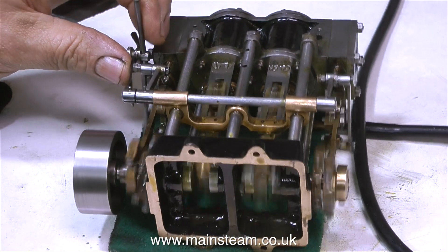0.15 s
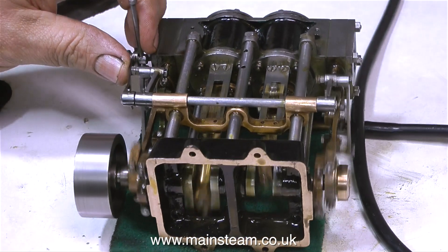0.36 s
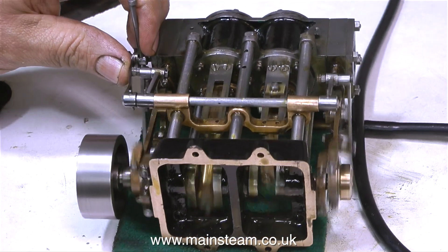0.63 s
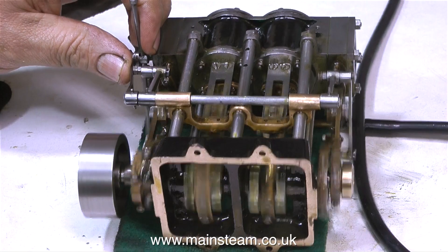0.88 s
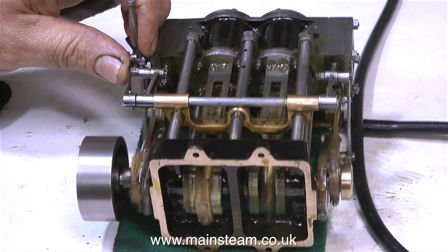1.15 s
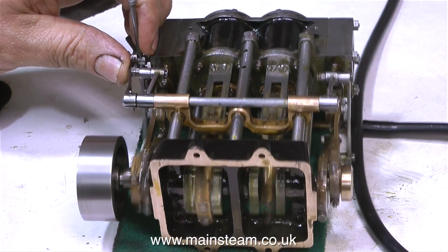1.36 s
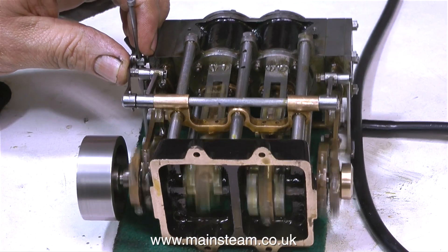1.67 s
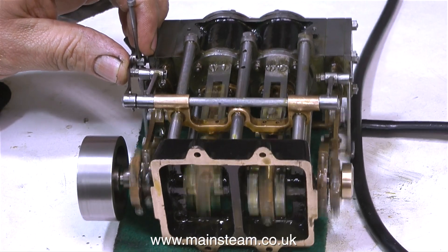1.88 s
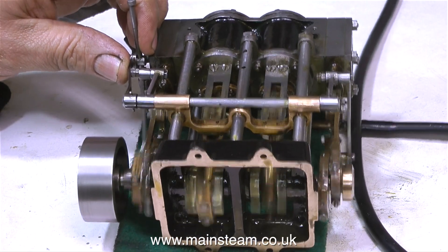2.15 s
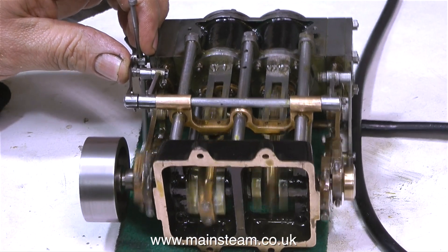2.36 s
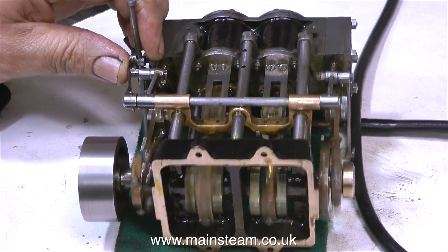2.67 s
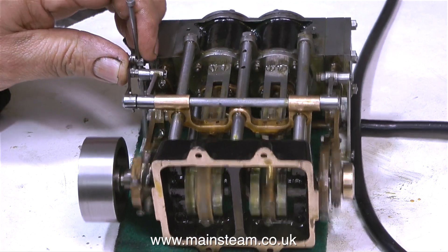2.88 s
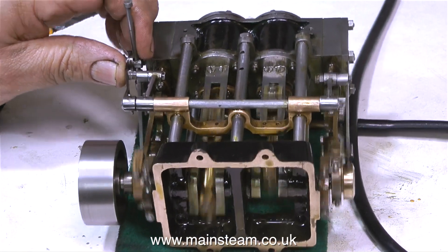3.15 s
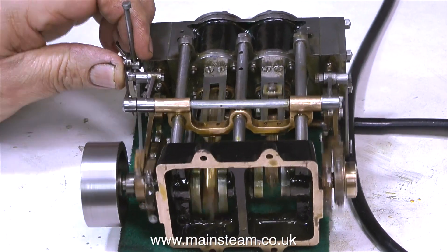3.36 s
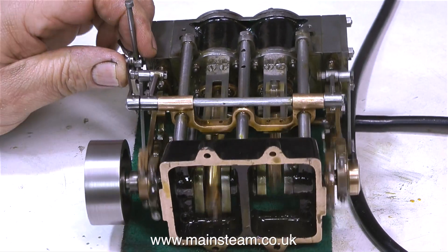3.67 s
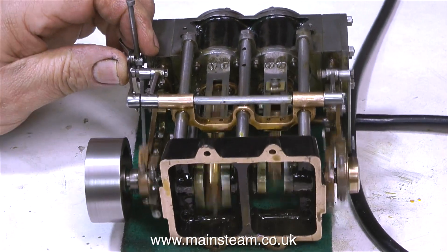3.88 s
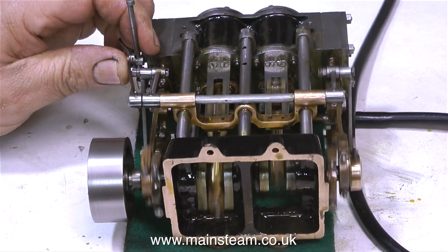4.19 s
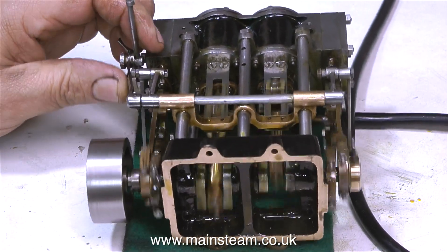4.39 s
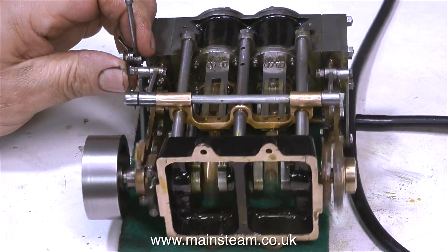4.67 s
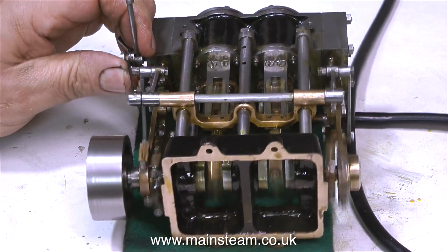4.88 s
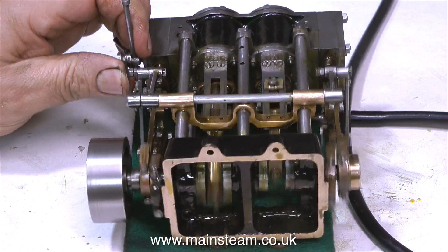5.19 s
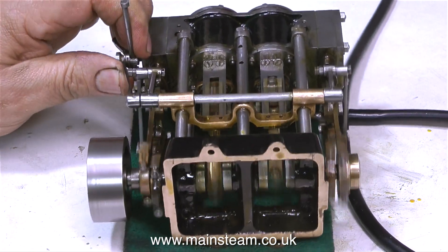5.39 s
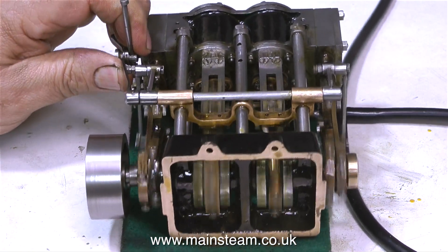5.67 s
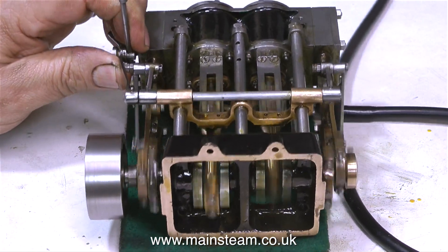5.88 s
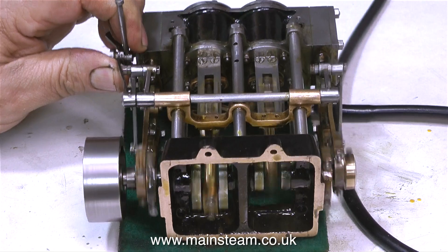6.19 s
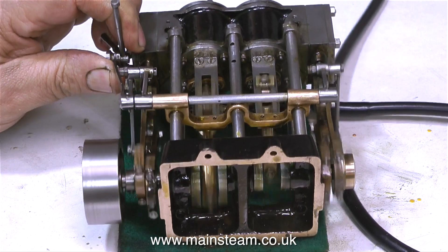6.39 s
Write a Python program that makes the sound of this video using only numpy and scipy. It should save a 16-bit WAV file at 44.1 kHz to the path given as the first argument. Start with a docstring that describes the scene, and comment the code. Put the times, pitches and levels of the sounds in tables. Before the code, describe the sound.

A small steam engine runs fast on compressed air, its rapid hissing exhaust beats joined by light knocks and metallic chatter.

```python
"""A twin-cylinder model steam engine runs on compressed air on a bench, at 13 rising to 16 turns a second.
From the start four exhaust beats a turn hiss through the ports, spitting oil,
and the connecting rod knocks. From 0.6 s slack links chatter in spells and the valve gear clinks.
From 1.2 s a link thuds against the reversing lever once a turn, in spells; from 2.3 s it groans too.
The knock softens at 3.7 s; after 5.4 s the motion settles and the exhaust beats on."""
import sys
import numpy as np
from scipy import signal
from scipy.fft import rfft, irfft
from scipy.io import wavfile

SR = 44100
rng = np.random.default_rng(int(sys.argv[2]) if len(sys.argv) > 2 else 0)


def wav_out(sig):
    """Save sig, one row per channel (or a flat mono array), as 16-bit PCM at SR to the path in sys.argv[1]."""
    wavfile.write(sys.argv[1], SR, np.round(np.clip(np.atleast_2d(sig).T, -1, 1) * 32767).astype(np.int16))


N = 288414

# Crankshaft speed. Each row: time in seconds, turns per second.
CRANK_SPEED = [(0.0, 13.163), (0.23, 13.467), (0.75, 14.753), (0.85, 14.671), (1.72, 14.955),
               (2.08, 15.213), (2.74, 15.004), (3.19, 15.529), (4.12, 15.314), (4.42, 15.124),
               (5.17, 15.104), (5.53, 15.701), (5.8, 15.936), (6.54, 15.884)]
# Valve gear modes. Each row: frequency in Hz, width in Hz, gain in dB.
GEAR_MODES = [(3570, 75, -10), (3697, 40, -1)]
# Crankcase and bed modes. Each row: frequency in Hz, width in Hz, gain in dB.
CASE_MODES = [(257, 56, -20), (286, 23, -1.5), (362.5, 15, 6.5), (386, 31, 6.5), (462, 84, -3),
              (533, 74, 1.5), (582, 23, -15), (710, 96, -20)]


def from_db(db):
    """Decibels to gain."""
    return 10 ** (np.asarray(db) / 20)


def unit_rms(x):
    """Scale to unit power."""
    return x / np.sqrt(np.mean(x ** 2) + 1e-20)


def curves(rows):
    """Interpolate rows of (seconds, values..) to every sample, one curve per value."""
    times_s, *columns = np.transpose(rows)
    return [np.interp(np.arange(N) / SR, times_s, column) for column in columns]


def drift(corner_hz):
    """Low-passed noise, unit RMS."""
    hz = np.arange(N // 2 + 1) * SR / N
    return unit_rms(irfft(rfft(rng.standard_normal(N)) / (1 + (hz / corner_hz) ** 2), N))


def noise(spectrum):
    """Unit-RMS noise shaped by rows of (Hz, dB)."""
    hz, db = np.transpose(spectrum)
    bin_hz = np.arange(N // 2 + 1) * SR / N
    gain = from_db(np.interp(np.log(bin_hz + 1), np.log(hz), db))
    return unit_rms(irfft(rfft(rng.standard_normal(N)) * gain, N))


def resonate(x, hz, width_hz):
    """Two-pole resonance, unit peak gain."""
    radius = np.exp(-np.pi * width_hz / SR)
    feedback = [1, -2 * radius * np.cos(2 * np.pi * hz / SR), radius ** 2]
    return signal.lfilter(np.array([1, 0, -1]) * (1 - radius ** 2) / 2, feedback, x + 1e-18)


def band(x, low_hz, high_hz, order):
    """Butterworth band-pass."""
    return signal.sosfilt(signal.butter(order, [low_hz, high_hz], "band", fs=SR, output="sos"), x)


def spell(start_s, end_s, attack_s=0.071, release_s=0.065):
    """Gate with linear ramps centred on start and end."""
    t = np.arange(N) / SR
    return np.clip((t - start_s) / attack_s + .5, 0, 1) * np.clip((end_s - t) / release_s + .5, 0, 1)


def at_angle(turn, angle_turn):
    """A unit click each time the crank passes an angle."""
    passes = np.floor(turn - angle_turn)
    return np.diff(np.maximum.accumulate(passes), prepend=passes[0])


def turns_past(turn, angle_turn):
    """Signed offset from a crank angle, within half a turn."""
    return (turn - angle_turn + .5) % 1 - .5


def around(turn, angle_turn, spread_turn):
    """Gaussian bump once a turn, centred on a crank angle."""
    return np.exp(-.5 * (turns_past(turn, angle_turn) / spread_turn) ** 2)


def clicks(events):
    """One click per row of (seconds, dB)."""
    times_s, db = np.transpose(events)
    return np.bincount((times_s * SR).astype(int), from_db(db), N)


def contacts(load, per_s):
    """Small random blows whose force follows the load."""
    hits = rng.random(N) < per_s / SR
    return hits * rng.uniform(0.7, 1, N) * rng.choice([-1, 1], N) * load


def struck(modes, blows, variety=0.22):
    """Each blow excites each mode with its own strength; a unit blow peaks near 1."""
    peak = sum(from_db(db) * 2 * np.pi * width_hz / SR for _, width_hz, db in modes)
    ring = sum(from_db(db) * resonate(blows * (1 + variety * rng.standard_normal(N)), hz, width_hz)
               for hz, width_hz, db in modes)
    return ring / peak


def peaked_hiss(peaks, flow):
    """One independent band of noise per spectral peak, following the flow."""
    return sum(from_db(db) * resonate(flow * rng.standard_normal(N), hz, width_hz)
               for hz, width_hz, db in peaks)


def workshop_noise(level_db=-50.0):
    """Steady low background of the room."""
    # Room noise spectrum. Each row: frequency in Hz, relative density in dB.
    spectrum = [(20, -27), (60, -28), (95, -23), (135, -5.5), (190, -7), (350, 10), (600, 9), (1000, -12),
                (1400, 2.5), (1580, -15), (2000, -2)]
    return from_db(level_db) * noise(spectrum)


def workshop_reverb(x, t60_s=0.087, wet_db=-10.5, delay_s=.002):
    """Add a short diffuse tail from bench and walls."""
    t = np.arange(SR // 2) / SR
    tail = rng.standard_normal(len(t)) * from_db(-60 * t / t60_s) * (t > delay_s)
    return x + from_db(wet_db) * signal.fftconvolve(x, tail / np.linalg.norm(tail))[:N]


def bench_throb(turn, gain_db=-65.5, angle_turn=.93):
    """The unbalanced crank nudges the bench once a turn."""
    # Bench modes. Each row: frequency in Hz, width in Hz, gain in dB.
    bench_modes = [(132, 25, 4), (167, 44, 3)]
    throb = struck(bench_modes, at_angle(turn, angle_turn), variety=.1)
    return from_db(gain_db) * band(throb, 98, 220, order=2)


def gear_clinks(gain_db=2.0):
    """Single blows ring the valve gear."""
    # Blows on the gear. Each row: time in seconds, strength in dB.
    blows = [(0.74, -24), (0.805, -23), (1.483, -22), (2.651, -30), (3.111, -36), (3.497, -22),
             (3.538, -23), (3.902, -26), (4.281, -30)]
    return from_db(gain_db) * band(struck(GEAR_MODES, clicks(blows)), 1800, 3440, order=2)


def slack_rattle(turn, link_gain_db=11.5, gear_gain_db=-55.5, case_lag_turn=0.024):
    """Slack links chatter, most in one part of the turn; crankcase, links and valve gear ring."""
    # Chatter spells. Each row: start and end in seconds, angle in turns, case and link drive in dB.
    slack_spells = [(0.602, 1.652, 0.22, -51.5, -81), (1.648, 2.29, 0.34, -49, -65),
                    (2.267, 3.747, 0.37, -50.5, -55.5), (4.792, 5.408, 0.59, -52.5, -60.5)]
    # Faint chatter throughout, fading as the engine runs in.
    idle_turn, idle_case_db, idle_link_db, fade_db_per_s = 0.38, -59.5, -71, 2.5
    idle_fade = from_db(-fade_db_per_s * np.arange(N) / SR)
    drives = [(idle_fade, idle_turn, idle_case_db, idle_link_db)]
    drives += [(spell(start_s, end_s), *rest) for start_s, end_s, *rest in slack_spells]
    case_load = link_load = looseness = 0
    for gate, angle, case_db, link_db in drives:
        case_load += gate * from_db(case_db) * (0.33 + around(turn, angle + case_lag_turn, 0.14))
        link_load += gate * from_db(link_db) * (.1 + around(turn, angle, 0.12))
        looseness += gate * from_db(case_db - idle_case_db)
    # Rod and link modes. Each row: frequency in Hz, width in Hz, gain in dB.
    link_modes = [(778, 53, 7.5), (878, 94, 2.5), (1145, 160, 1.5), (1370, 63, 5), (1690, 96, -10)]
    case = band(struck(CASE_MODES, contacts(case_load, per_s=1500)), 275, 765, order=3)
    links = band(struck(link_modes, contacts(link_load, per_s=1000)), 360, 1630, order=2)
    # The gear ticks at both ends of the valve's travel.
    tick_turn, return_turn = .37, .9
    ticks = from_db(14.0) * at_angle(turn, tick_turn) + from_db(7.5) * at_angle(turn, return_turn)
    chatter = contacts(.3 + around(turn, tick_turn, spread_turn=.06), per_s=300)
    gear = unit_rms(band(struck(GEAR_MODES, ticks + chatter), 2700, 5800, order=2))
    return case + from_db(link_gain_db) * links + from_db(gear_gain_db) * looseness ** 0.42 * gear


def lever_thuds(turn, thud_hz=334.0, width_hz=72.0, cushion_width_hz=130.0, jitter_turn=0.0056):
    """The link shoves the hand-held lever once a turn: a dull, cushioned thud."""
    # Thud spells. Each row: start and end in seconds, angle in turns, strength in dB.
    thud_spells = [(1.15, 1.55, .18, -37), (1.693, 1.812, .34, -32), (2.4, 3.626, .37, -37),
                   (3.61, 3.852, .16, -35), (3.844, 4.35, .16, -41.5), (4.78, 5.353, .355, -32.5)]
    crank = turn + jitter_turn * drift(19)
    shoves = sum(spell(start_s, end_s) * from_db(db) * at_angle(crank, angle)
                 for start_s, end_s, angle, db in thud_spells)
    thuds = struck([(thud_hz, width_hz, 0)], shoves, variety=0.083)
    return resonate(thuds, thud_hz, cushion_width_hz)


def lever_groans(turn, groan_hz=576.0, waver=0.0234, sag_per_turn=0.22):
    """The link rubs the lever once a turn: a short tone of sagging pitch."""
    # Groan spells. Each row: start and end in seconds, angle in turns, peak in dB.
    groan_spells = [(2.3, 3.799, .35, -50.5), (3.048, 3.6, 0.477, -44.5), (3.786, 4.834, 0.44, -42.5),
                    (4.84, 5.414, 0.536, -45)]
    groans = np.zeros(N)
    for start_s, end_s, angle, db in groan_spells:
        pitch_hz = groan_hz * (1 + waver * drift(87) - sag_per_turn * turns_past(turn, angle))
        rub = spell(start_s, end_s) * around(turn, angle, spread_turn=0.054) * from_db(db)
        groans += rub * np.sin(2 * np.pi * np.cumsum(pitch_hz) / SR)
    return groans


def rod_knocks(turn, cruise_turns_per_s=15, delay_turn=.1, soften_db=2.5, jitter_turn=.003):
    """The rod's knock leads a run of bearing contacts each turn; the crankcase rings."""
    # Knock spells at cruise speed. Each row: start and end in seconds, angle in turns, strength in dB.
    knock_spells = [(-.2, 2.28, .55, -35), (2.28, 3.74, 0.37, -34), (3.74, 6.8, .42, -43)]
    # Bearing contacts. Each row: lag behind the knock in turns, relative strength in dB.
    bearing_contacts = [(0, 0.5), (0.073, -10.5), (0.212, -9.5), (0.447, -9.5), (0.559, -4), (0.688, -9.5)]
    # Each turn per second above cruise adds one delay_turn and takes off one soften_db.
    overspeed = curves(CRANK_SPEED)[0] - cruise_turns_per_s
    crank = turn - delay_turn * overspeed + jitter_turn * drift(10)
    blows = sum(spell(start_s, end_s) * from_db(knock_db + contact_db) * at_angle(crank, angle + lag)
                for start_s, end_s, angle, knock_db in knock_spells
                for lag, contact_db in bearing_contacts)
    case = struck(CASE_MODES, blows * from_db(-soften_db * overspeed), variety=.1)
    return band(case, 248, 695, order=4)


def oil_spurts(sigma_s=0.0021, gain_db=-7.5):
    """Flow multiplier: oily air spurts for a few milliseconds."""
    # Spurts. Each row: time in seconds, relative strength in dB.
    spurts = [(0.056, -2), (0.746, 5), (0.81, 2), (1.386, 3), (2.219, 4), (2.251, 6), (2.714, 1),
              (2.748, 5), (3.12, 2), (3.142, 3), (4.617, 4), (5.982, 1)]
    surge = signal.windows.gaussian(SR // 50, sigma_s * SR)
    return 1 + from_db(gain_db) * signal.fftconvolve(clicks(spurts), surge, "same")


def oil_spits(per_s=130, gain_db=-18.0, decay_s=0.0035):
    """Flow multiplier: oil drops break out of the ports, each with a brief surge."""
    drops = (rng.random(N) < per_s / SR) * np.minimum(rng.exponential(1, N), 3)
    surges = signal.lfilter([1], [1, -np.exp(-1 / (decay_s * SR))], drops + 1e-18)
    return 1 + from_db(gain_db) * surges


def valve_flow(turn, edge_turn=0.041, leak_db=-6.0, spread_db=1.0):
    """Drive for port, jet and mid hiss: a valve slides open, the cylinder empties, the valve shuts."""
    # Exhaust beats. Each row: opening angle, open span and pressure decay in turns,
    # then relative drive of port, jet and mid hiss in dB.
    beats = [(0.297, 0.96, 0.25, 4.5, -1.5, 3), (.53, 0.31, 0.15, 5.5, 0.5, 4),
             (0.799, 0.24, 0.27, 5.5, 0.5, 4.5), (.99, 0.22, 1, 0.5, -0.5, -0.5)]
    power = np.full((3, N), from_db(leak_db) ** 2)
    for open_turn, span_turn, decay_turn, *drives_db in beats:
        count, age_turn = np.divmod(turn - open_turn + 2, 1)
        opening = np.clip(age_turn / edge_turn, 0, 1)
        closing = np.clip((span_turn - age_turn) / edge_turn + .5, 0, 1)
        strength = from_db(spread_db * rng.standard_normal(size=128))[count.astype(int)]
        pressure = strength * np.exp(-age_turn / decay_turn)
        power += np.outer(from_db(drives_db), opening * closing * pressure) ** 2
    return np.sqrt(power)


def exhaust(turn, port_db=-24.5, jet_db=-26.0, mid_db=-40.0, flutter_db=0.37, mid_flutter_db=1.95):
    """The beats whistle in the ports and hiss as a free jet, with peaks in the mid range."""
    # Air supply. Each row: time in seconds, flow in dB above normal.
    air_flow = [(0, 1.5), (0.31, -1.5), (0.81, 0.4), (0.86, -1.5), (1.43, 0.8), (1.59, -1.0), (2.16, -1.2),
                (2.56, 0.85), (2.98, 0.4), (3.08, 1.3), (3.31, 0), (3.54, 0.9), (3.99, 0.7), (4.95, 1.17),
                (5.08, -1.0), (5.63, 0.26), (6.29, -1.2), (6.54, -1.0)]
    # Exhaust colour. Each row: time in seconds, lift of port whistle and of mid hiss in dB.
    colour = [(0, 1.2, 0), (1.55, -0.3, 0.5), (1.7, 1.6, 0.2), (1.97, 1, 2.5), (2.56, -0.3, 1.3),
              (3.34, -0.6, -2.3), (3.47, -1.5, 0), (4.44, -1.5, -0.9), (4.58, -0.5, 2.2),
              (4.73, -0.5, -0.4), (6.54, 1.6, -1.5)]
    # Port resonances. Each row: frequency in Hz, width in Hz, gain in dB.
    port_modes = [(9760, 830, -4), (10250, 110, 1.5), (10940, 750, -4.5), (11600, 420, -9),
                  (12340, 550, -9.5)]
    # Mid-range peaks of the exhaust hiss, coloured by bench and room reflections.
    # Each row: frequency in Hz, width in Hz, gain in dB.
    mid_hiss_peaks = [(2028, 108, -9), (2244, 160, -12), (2550, 74, -2), (2734, 49, -4.5), (2915, 69, 0),
                      (3143, 48, -1.5), (3287, 108, -2.5), (3618, 82, 0.5), (3973, 160, -5),
                      (4320, 35, -17), (4400, 70, -4.5), (4806, 35, -4.5), (5590, 21, -0.5)]
    # Jet spectrum. Each row: frequency in Hz, relative density in dB.
    jet_spectrum = [(1500, -24.5), (2200, -19.5), (4000, -13), (5200, -9.5), (6500, -4.5), (8400, -5),
                    (9500, -1), (12800, -4.5), (14200, 4.5), (16000, -0.5)]
    air_db, = curves(air_flow)
    port_lift_db, mid_lift_db = curves(colour)
    port_flow, jet_flow, mid_flow = valve_flow(turn)
    spurts = oil_spurts()
    sputter = from_db(-flutter_db * drift(250)) * oil_spits()
    port = band(peaked_hiss(port_modes, port_flow * sputter * spurts), 8930, 14800, order=3)
    jet = band(noise(jet_spectrum) * jet_flow * sputter * np.sqrt(spurts), 1170, 21000, order=3)
    mid_flutter = from_db(mid_flutter_db * drift(150))
    mid_hiss = band(peaked_hiss(mid_hiss_peaks, mid_flow * mid_flutter), 1820, 5840, order=4)
    return (from_db(port_db + air_db + port_lift_db) * unit_rms(port)
            + from_db(jet_db + air_db) * unit_rms(jet)
            + from_db(mid_db + 1.3 * air_db + mid_lift_db) * unit_rms(mid_hiss))


def scene(start_turn=.1):
    """The engine in the workshop, mono; the crank angle times the beats and knocks."""
    turn = start_turn + np.cumsum(curves(CRANK_SPEED)[0]) / SR
    engine = (exhaust(turn) + gear_clinks() + rod_knocks(turn) + slack_rattle(turn)
              + lever_thuds(turn) + lever_groans(turn) + bench_throb(turn))
    return (workshop_reverb(engine) + workshop_noise())[None]


def record(dry, cutoff_hz=15750):
    """Steep elliptic low-pass."""
    return signal.sosfilt(signal.ellip(14, .1, 90, cutoff_hz, fs=SR, output="sos"), dry)


dry = scene()
out = record(dry)
wav_out(out)
```